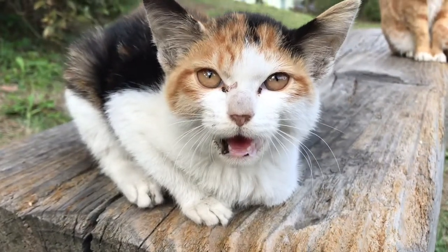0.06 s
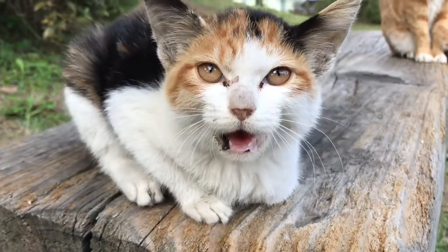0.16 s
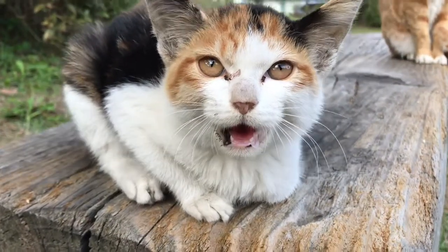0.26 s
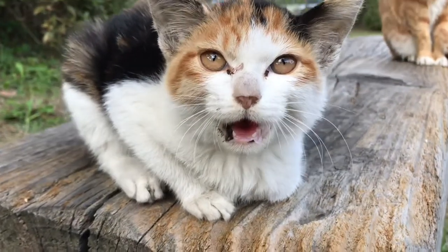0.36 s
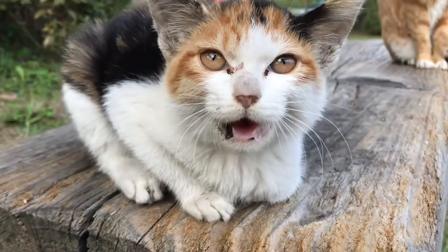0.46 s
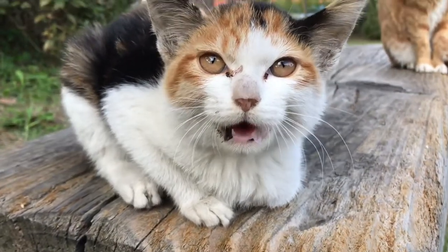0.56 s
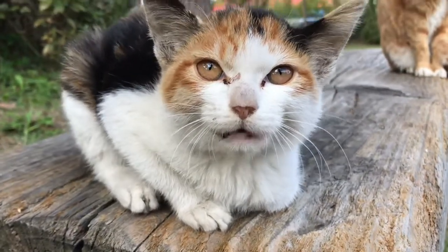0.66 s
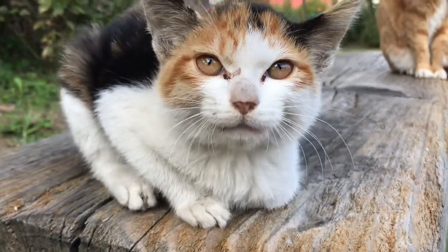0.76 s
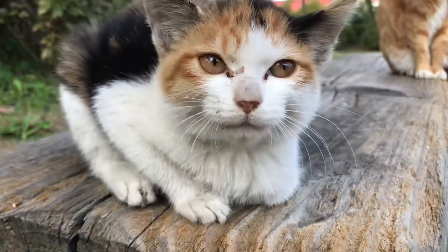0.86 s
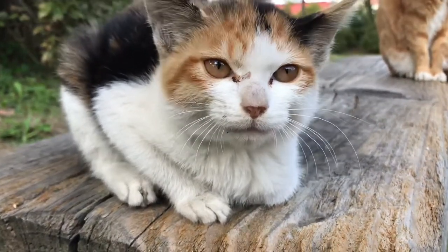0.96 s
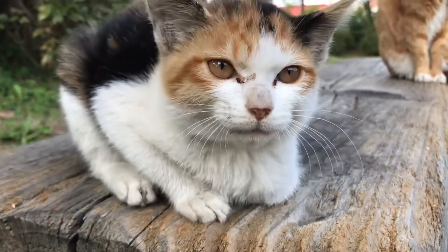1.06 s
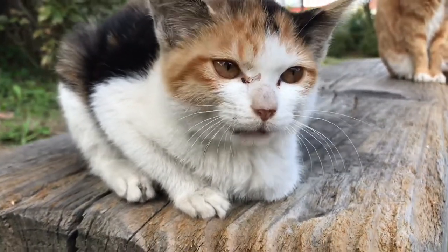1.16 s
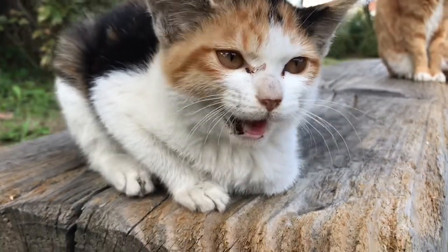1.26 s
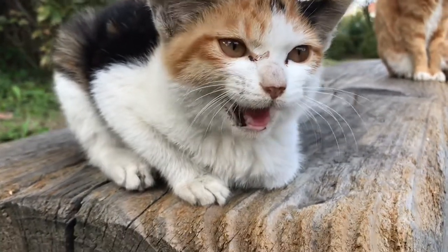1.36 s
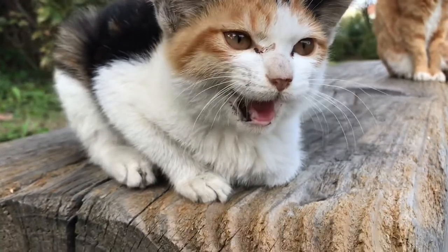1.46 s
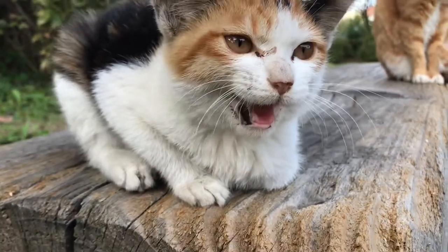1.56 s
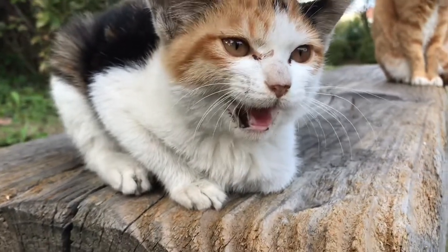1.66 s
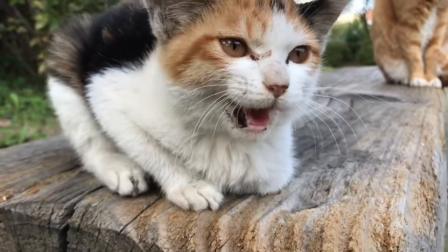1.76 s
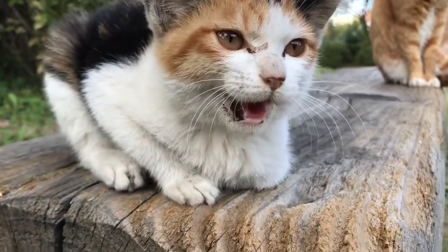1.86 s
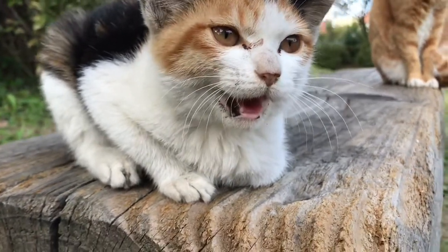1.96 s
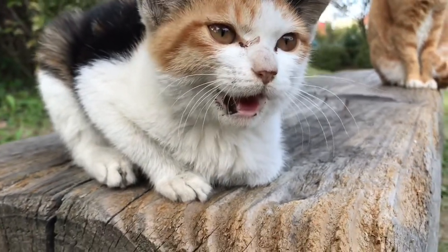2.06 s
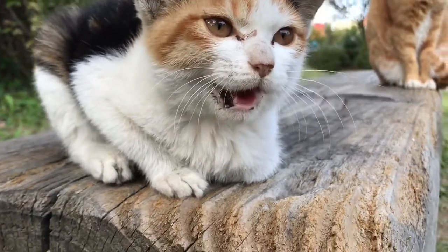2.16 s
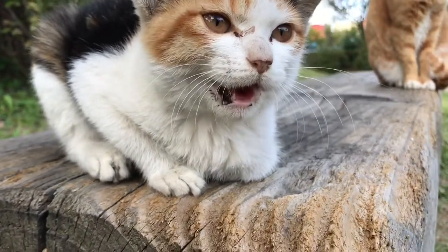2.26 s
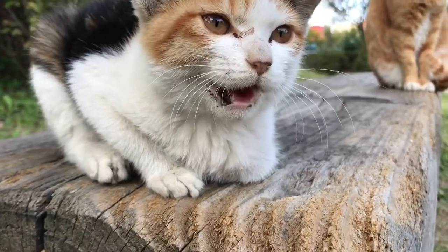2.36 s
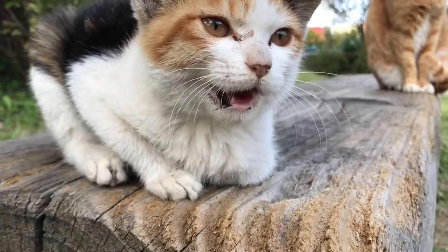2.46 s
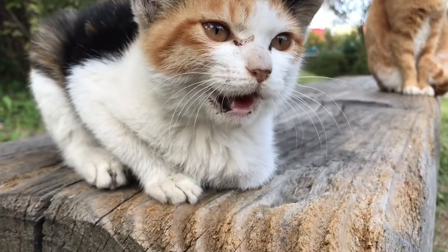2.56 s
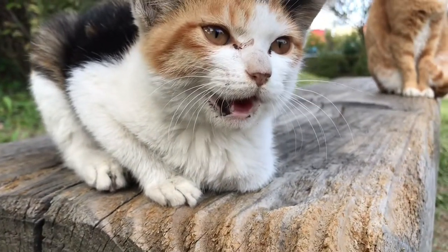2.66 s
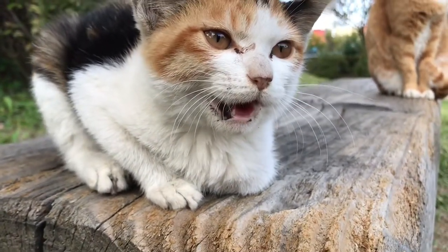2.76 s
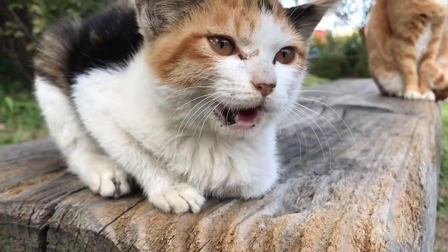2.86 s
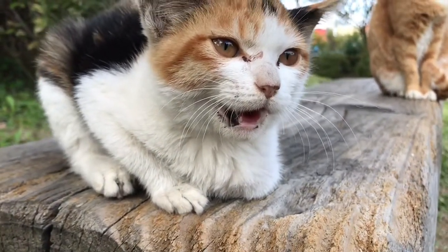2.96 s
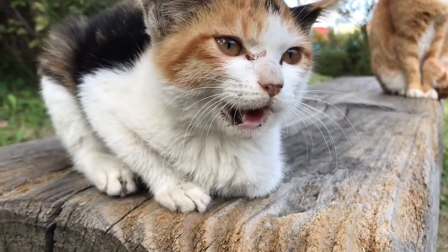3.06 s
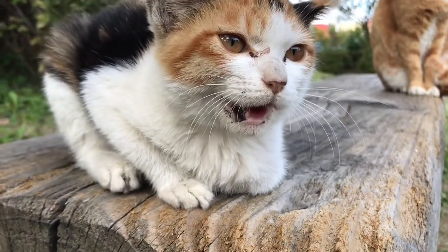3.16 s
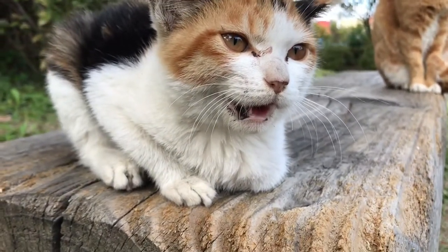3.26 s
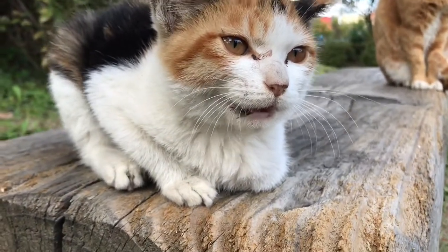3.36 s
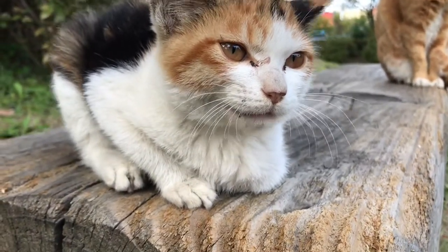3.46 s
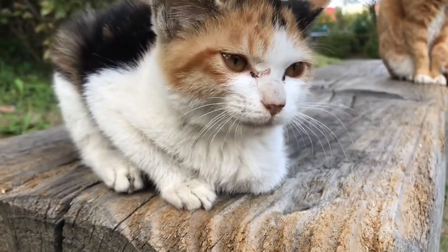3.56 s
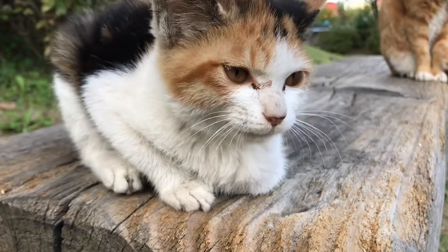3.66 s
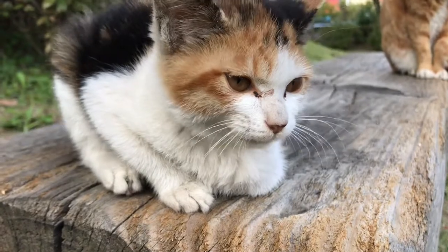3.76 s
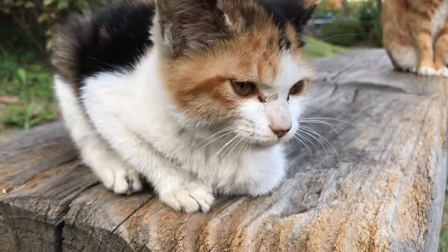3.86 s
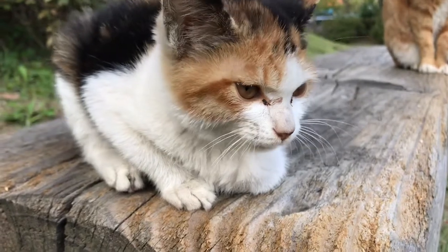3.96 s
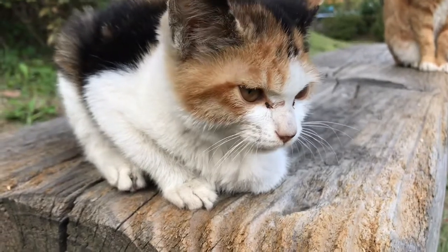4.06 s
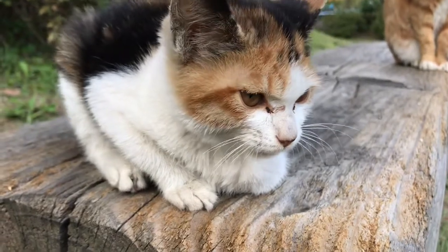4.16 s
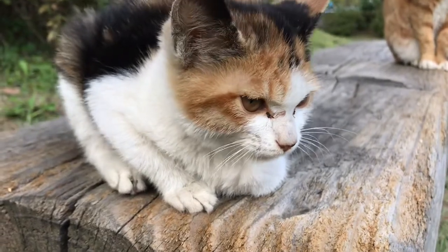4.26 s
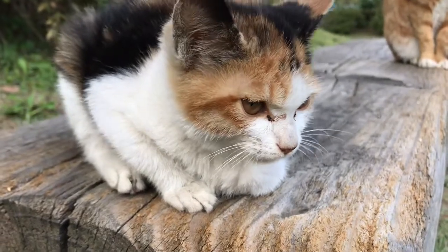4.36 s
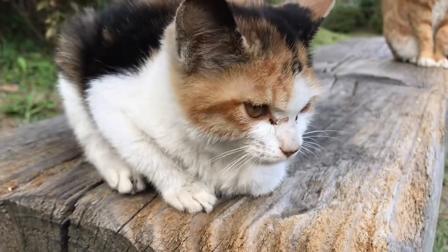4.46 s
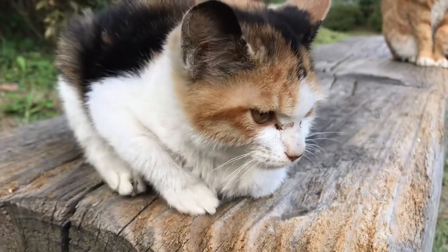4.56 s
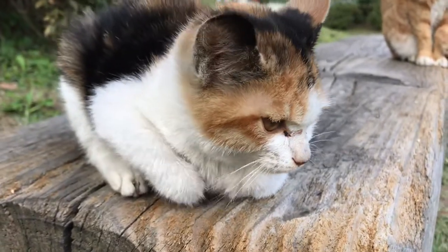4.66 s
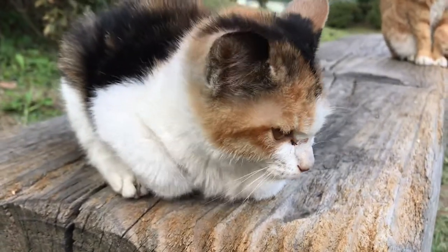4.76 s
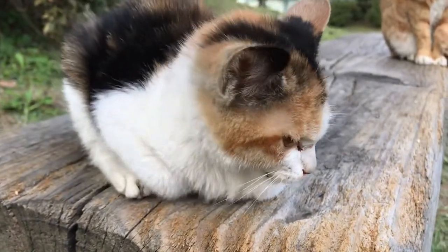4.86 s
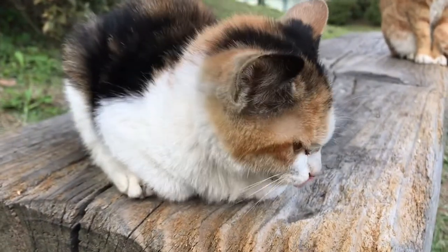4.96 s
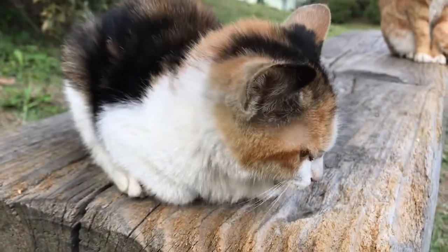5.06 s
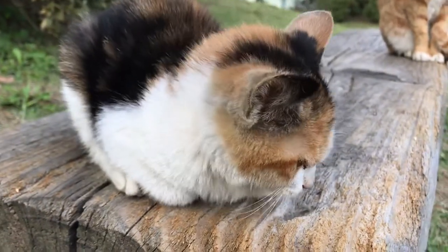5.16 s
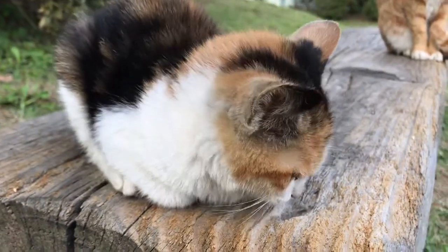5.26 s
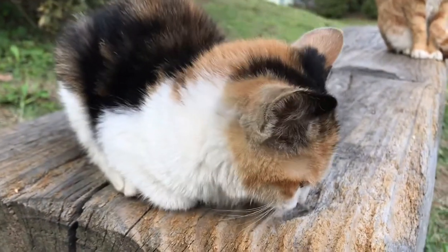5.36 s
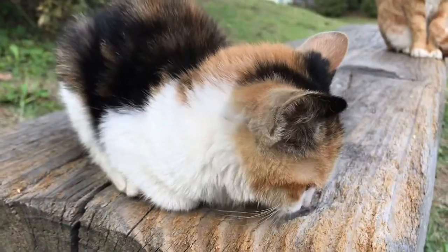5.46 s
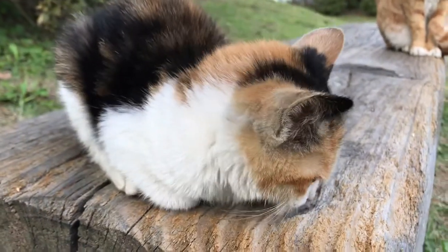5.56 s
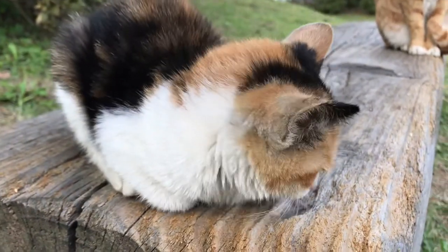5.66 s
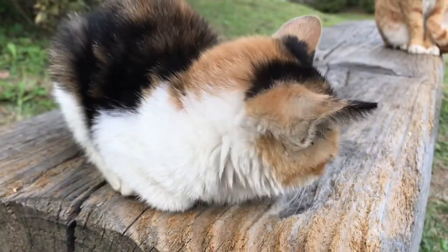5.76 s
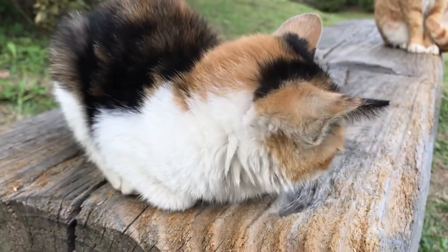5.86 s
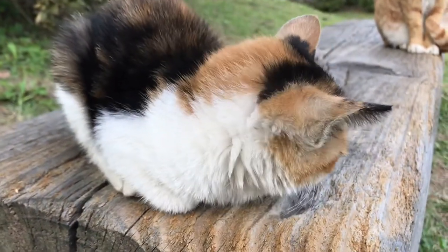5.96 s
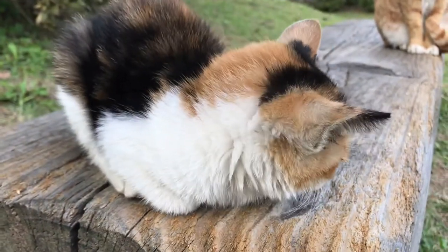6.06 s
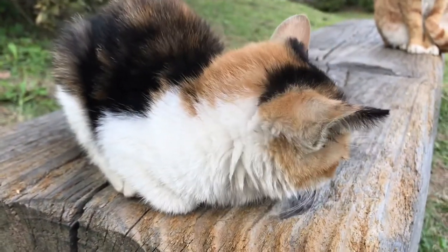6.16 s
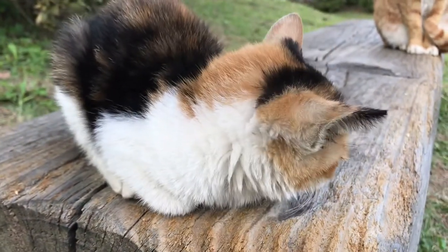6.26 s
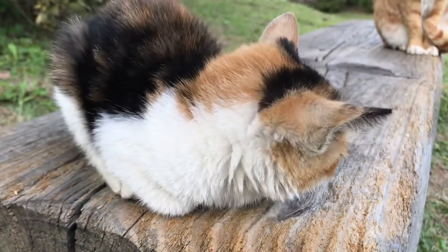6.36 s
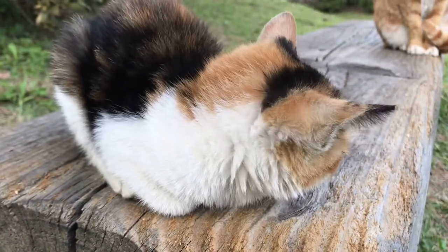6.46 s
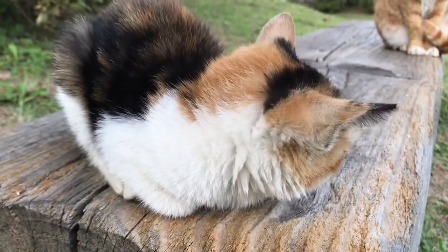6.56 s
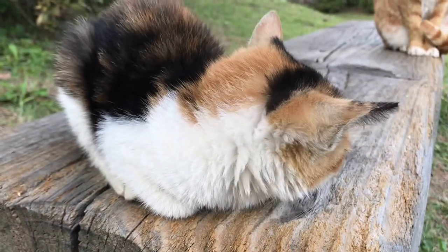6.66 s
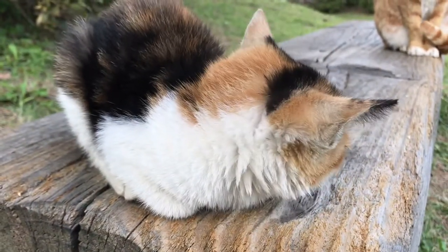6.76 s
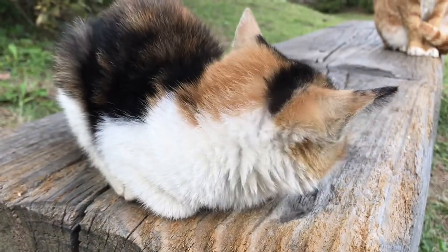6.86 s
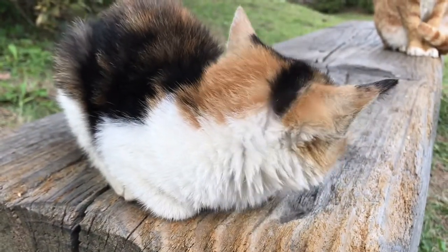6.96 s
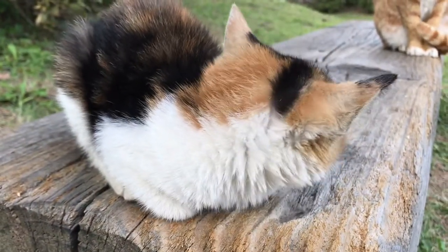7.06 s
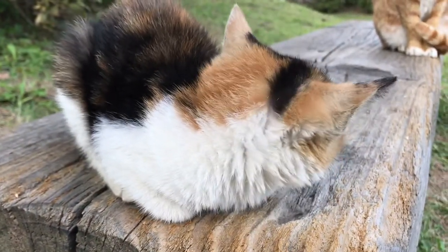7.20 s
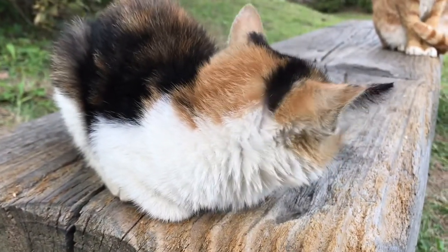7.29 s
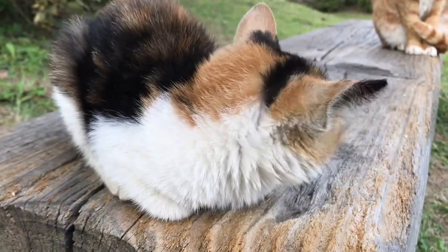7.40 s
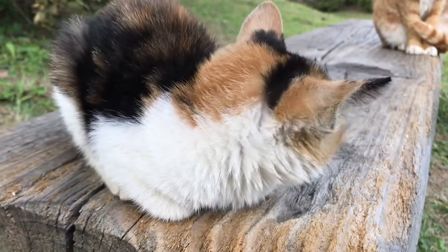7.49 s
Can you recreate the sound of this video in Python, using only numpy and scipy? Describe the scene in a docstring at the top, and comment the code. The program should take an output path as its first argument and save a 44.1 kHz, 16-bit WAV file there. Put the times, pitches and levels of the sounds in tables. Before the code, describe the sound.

Close raspy kitten mews outdoors, with a low idling engine, faint sliding bird whistles, wind thumps and distant dragged metal.

```python
"""A young cat on a log mews twice, close by, its voice breaking into rasps; another cat answers once.
Its vocal folds buzz, its throat and mouth shape the buzz, and uneven pulses make the rasp.
An engine hums a way off over a wash of traffic and leaves, a bird sings sliding whistles and puffs
of wind thump the microphone. Later comes a faint thin tone, then distant dragged metal scrapes and rings."""
import sys
import numpy as np
from scipy import signal
from scipy.fft import rfft, irfft
from scipy.io import wavfile
from scipy.ndimage import uniform_filter1d

SR = 44100
rng = np.random.default_rng(int(sys.argv[2]) if len(sys.argv) > 2 else 0)


def generate_wav(sig):
    """Save sig (samples, or channels by samples) to the path in sys.argv[1] as 16-bit PCM at SR."""
    pcm = np.round(np.clip(np.atleast_2d(sig).T, -1, 1) * 32767).astype(np.int16)
    wavfile.write(sys.argv[1], SR, pcm)


N = 332068


def gain(db):
    """Turns decibels into a multiplier."""
    return 10 ** (np.asarray(db) / 20)


def unit(x):
    """Scales a sound to an average (rms) level of 1."""
    return x / np.sqrt(np.mean(x ** 2) + 1e-20)


def steady(x):
    """Holds the level near 1 at every moment."""
    return x / np.sqrt(abs(uniform_filter1d(x ** 2, size=1500)) + 1e-12)


def level_at(curve, hz):
    """Looks up a tone curve's decibels at hz."""
    curve_hz, db = np.transpose(curve)
    return np.interp(np.log(hz + 1), np.log(curve_hz + 1), db)


def unroll(rows):
    """Joins a table's rows with straight lines, sample by sample."""
    times, *columns = np.transpose(rows)
    t = np.arange(max(times[0], 0), times[-1], 1 / SR)
    return t, [np.interp(t, times, column) for column in columns]


def add(mix, start_s, sound):
    """Mixes a sound in, cutting off what runs past the end."""
    part = mix[round(start_s * SR):][:len(sound)]
    part += sound[:len(part)]


def bump(t, middle_s, length_s):
    """A smooth rise and fall."""
    return np.exp(-(2 * (t - middle_s) / length_s) ** 4)


def noise(t):
    """Plain hiss, as long as t."""
    return rng.standard_normal(len(t))


def wander(t, hz):
    """A smooth random wobble of size 1, changing about hz times a second."""
    return unit(signal.sosfilt(signal.butter(2, hz, fs=SR, output="sos"), noise(t)))


def resonate(x, hz, width_hz, order=2):
    """Keeps the sound near hz: shifts it down to zero, smooths it and shifts it back."""
    spin = np.exp(2j * np.pi * np.cumsum(hz * np.ones(len(x))) / SR)
    pole = np.exp(-np.pi * width_hz / SR)
    return 2 * (spin * signal.sosfilt([[1 - pole, 0, 0, 1, -pole, 0]] * order, x / spin + 1e-18)).real


# Where the voice cracks: middle_s, length_s, scatter_cycles
RASPS = [(.05, .015, .012), (.112, .008, .022), (.282, .01, .02), (.305, .014, .017), (.668, .024, .08),
         (1.31, .035, .08), (1.365, .02, .015), (1.67, .025, .005), (.35, .05, .005), (2.53, .03, .022),
         (2.685, .05, .06), (2.73, .02, .03), (2.79, .05, .022), (2.845, .035, .075), (2.882, .016, .06),
         (2.935, .03, .055), (3.062, .012, .035), (3.095, .022, .065), (3.135, .022, .06),
         (3.175, .035, .06), (3.25, .032, .065), (3.33, .03, .015), (2.96, .62, .011), (3.42, .02, .07)]

def vocal_folds(t, hz):
    """The folds buzz; in a rasp the pitch sags and pulses come early or late, weak or strong."""
    scatter = .00125 + sum(depth * bump(t, s, length) for s, length, depth in RASPS)
    even_cycles = np.cumsum(hz * (1 - .3 * scatter + .00643 * wander(t, 35.3))) / SR
    cycles = even_cycles + scatter * wander(t, 170)
    # the k * k term smears each pulse into a short sweep
    pulses = unit(sum(np.cos(2 * np.pi * (k * cycles + .045 * k * k)) for k in range(2, 23)))
    buzz = pulses * (1 + 4 * scatter * wander(t, 200)) + .035 * noise(t)
    return buzz, scatter, even_cycles, cycles


# Bright ringing behind the teeth and at the lips: pitch_hz, width_hz, level_db
TEETH_BANDS = [(5690, 1570, 5.5), (7500, 640, -4), (8630, 1500, 5.5)]
LIP_BANDS = [(11130, 1100, 3.5), (14100, 2900, -7)]
# The shape of each mew: time_s, pitch_hz, throat_db, mouth_hz, mouth_db, front_db
MEW_SHAPES = [
    [(0.0, 703, -37, 2480, -38, -37), (.04, 701, -40.5, 2470, -37.5, -39),
     (.11, 735, -41.5, 2630, -30.5, -35.5), (.21, 719, -41.5, 2570, -34.5, -38),
     (.34, 722, -40, 2570, -32, -37.5), (.384, 696, -38, 2514, -36.5, -40.5),
     (.44, 710, -39, 2510, -35, -38), (.615, 621.5, -37, 2020, -41, -44.5),
     (.68, 575, -45.5, 2366, -54, -46.5)],
    [(1.3, 491, -54, 2660, -50, -61), (1.33, 566, -52, 2760, -48, -50.5),
     (1.38, 674, -43, 2840, -43.5, -48), (1.48, 745, -44.5, 2660, -52, -42.5),
     (1.56, 751, -43, 2930, -39, -38.5), (1.72, 764.4, -44, 2850, -39, -39.5),
     (1.84, 744, -41.5, 2880, -38, -40.5), (1.96, 745, -39, 2490, -41, -42),
     (2.17, 681, -40, 1905, -34.5, -46.5), (2.23, 695, -45.5, 1860, -33, -48.5),
     (2.36, 685, -40, 1890, -36, -51.5), (2.55, 685, -36, 1910, -39, -50.5),
     (2.64, 664, -41.5, 1876, -32.5, -49), (2.73, 653, -39.5, 2120, -35, -45.5),
     (2.99, 650, -38, 2425, -36, -44), (3.24, 628, -39, 2150, -35.5, -46.5),
     (3.4, 592.4, -39.5, 1730, -41.5, -51.5), (3.43, 649, -48, 1867, -73, -42)],
]
# The tone of each mew: teeth_db, lips_db, eddy_db, closing_hum_db
MEW_TONES = [(-22.5, -62.5, -50.5, 13), (-16, -61.5, -65, -1)]

def mew(shape, teeth_db, lips_db, eddy_db, closing_hum_db):
    """The buzz rings in throat, mouth, teeth and lips, while air swirls over the tongue."""
    t, (hz, throat_db, mouth_hz, mouth_db, front_db) = unroll(shape)
    rise_hz = .96 * np.maximum(mouth_hz - 2436, 0)  # the front of the mouth follows the mouth upward
    bright_db = 6 * rise_hz / 1000
    mouth_db, front_db = (db + .92 * wander(t, 13.3) for db in (mouth_db, front_db))
    buzz, scatter, even_cycles, cycles = vocal_folds(t, hz)
    breathy = buzz + (.5 + 9 * scatter) * noise(t)
    teeth, lips = (sum((-1) ** k * gain(db + k * bright_db) * resonate(breathy, band_hz + rise_hz, width)
                       for k, (band_hz, width, db) in enumerate(bands))
                   for bands in (TEETH_BANDS, LIP_BANDS))
    gusts = (1 + np.cos(2 * np.pi * cycles)) * noise(t)  # one gust of breath a pulse
    eddies = unit(resonate(gusts, 2590, width_hz=930, order=3))
    voice = gain(throat_db) * steady(resonate(buzz, 2 * hz, width_hz=860, order=4))
    voice -= gain(mouth_db) * steady(resonate(buzz, mouth_hz, width_hz=1530, order=4))
    voice += gain(front_db) * steady(resonate(buzz, 3740 + rise_hz, width_hz=1810, order=4))
    voice -= gain(front_db + teeth_db + bright_db) * steady(teeth)
    voice -= gain(lips_db + .55 * (throat_db + 37)) * steady(lips)  # partly follows the throat's level
    voice += gain(eddy_db + 84 * scatter + 4 * wander(t, 30)) * eddies
    hum_db = -54.5 + closing_hum_db * bump(t, t[-1], .046)  # the lowest tone can swell as the lips close
    voice += gain(hum_db) * np.sqrt(2) * np.cos(2 * np.pi * even_cycles)
    return t[0], -voice * signal.windows.tukey(len(t), 400 / len(t))


# The idling hum: time_s, firing_hz, firing_db, octave_below_db
ENGINE_IDLE = [(0.0, 132, -31, -36), (.08, 132.6, -38, -38), (1.45, 133.5, -38.5, -42.5),
               (1.68, 133.5, -38, -38.5), (2.3, 133, -36.5, -41.5), (2.53, 137, -51.5, -42.5),
               (2.68, 138, -33, -50), (2.9, 136.5, -44, -47), (3.4, 137, -43.5, -47),
               (4.28, 136.7, -43, -47.5), (4.57, 130, -37, -44), (4.85, 132.7, -41, -46),
               (5.68, 132.5, -34.5, -38.5), (5.9, 132, -39.5, -50), (6.17, 133.5, -35.5, -42),
               (6.33, 136, -47.5, -44.5), (6.64, 132.3, -35, -37), (6.98, 132.5, -40.5, -46.5),
               (7.53, 132.5, -33, -37.5)]
# Its higher tones: times_firing_rate, level_db (played 40 dB lower, whatever the firing level)
ENGINE_OVERTONES = [(1.499, -20), (2.048, -18), (2.498, -31.5)]

def engine():
    """The firing makes two low, wavering tones; higher ones are blurred by distance."""
    t, (hz, firing_db, half_db) = unroll(ENGINE_IDLE)
    cycles = np.cumsum(hz) / SR
    firing = gain(firing_db + wander(t, 5.6)) * np.sin(2 * np.pi * cycles)
    half = gain(half_db + 1.14 * wander(t, 3.5)) * np.sin(np.pi * cycles + .32 * wander(t, 11))
    upper = sum(gain(db - 40) * unit(resonate(noise(t), k * hz, 18.2)) for k, db in ENGINE_OVERTONES)
    return t[0], np.sqrt(2) * (firing + half) + upper


# The tone of the background: pitch_hz, relative_db
BACKGROUND_TONE = [(15, -34), (25, -13), (53, -0.5), (91, -5.5), (140, 2), (160, -4.5), (183, -6),
                   (274, -9.5), (445, -23), (1240, -26), (1380, -26.5), (3170, -34), (4380, -39.5),
                   (5010, -44.5), (15500, -54.5)]

def traffic_and_leaves(level_db=-46):
    """Far traffic and leaves blend into a low wash with drifting louder patches."""
    frames, hz = N // 512 + 5, np.fft.rfftfreq(2048, 1 / SR)
    real, imaginary, patches = rng.standard_normal((frames, 1025, 3)).T
    patches = unit(uniform_filter1d(uniform_filter1d(patches, size=20, axis=0), size=6, axis=1))
    spectra = (real + 1j * imaginary) * gain(level_at(BACKGROUND_TONE, hz)[:, None] + 1.27 * patches)
    wash = signal.istft(spectra, nperseg=2048, noverlap=1536)[1]
    return gain(level_db) * unit(wash[:N])


# Clicks of lips and tongue: start_s, level_db, pitch_hz
LIP_SMACKS = [(.646, -27, 3600), (.667, -28, 2600), (1.298, -33, 3000), (3.40, -42, 4000),
              (3.515, -42, 7000), (3.5152, -47, 2500), (4.24, -52, 5000)]
# Air through the teeth: middle_s, length_s, level_db, pitch_hz
TEETH_HISSES = [(.672, .036, -50, 13300), (.669, .024, -47.5, 3200), (.69, .04, -60, 3400),
                (1.312, .03, -57, 3200), (3.43, .04, -55.5, 10500), (3.435, .03, -55, 3800)]

def mouth_noises():
    """Short hisses and wet clicks as the cat's mouth opens and shuts."""
    out, t = np.zeros(N), np.arange(N) / SR
    for middle_s, length_s, db, hz in TEETH_HISSES:
        out += gain(db) * bump(t, middle_s, length_s) * unit(resonate(noise(t), hz, .26 * hz))
    click_t = t[:300]
    for start_s, db, hz in LIP_SMACKS:
        add(out, start_s, gain(db) * np.exp(-click_t / .0005) * np.sin(2 * np.pi * hz * click_t))
    return out


def bird_melody(notes, bottom_hz=1040, creep_hz_per_s=400):
    """Each note heads for its top pitch, creeps upward, slides to the bottom and waits there."""
    t = np.arange(notes[0][0], notes[-1][5], 1 / SR)
    hz, effort_db = np.zeros((2, len(t)))
    for start_s, first_hz, top_hz, climb_s, slide_start_s, end_s, bend, db in notes:
        age = np.maximum(t - start_s, 0)
        climb = first_hz + (top_hz - first_hz) * np.tanh((age / climb_s) ** 1.4) + creep_hz_per_s * age
        slide = np.clip((t - slide_start_s) / (end_s - slide_start_s), 0, 1) ** bend
        begun = t >= start_s
        hz[begun] = (climb + (bottom_hz - climb) * slide)[begun]
        effort_db[begun] = db
    return t, uniform_filter1d(hz, 800, mode="nearest"), uniform_filter1d(effort_db, 2000, mode="nearest")


# Notes of each phrase: start_s, first_hz, top_hz, climb_s, slide_start_s, end_s, slide_bend, effort_db
BIRD_PHRASES = [
    [(.68, 1950, 1950, .07, .68, .82, .8, -63), (.825, 1050, 1960, .065, 1.0, 1.195, 3.2, -62)],
    [(3.09, 1510, 1510, .07, 3.09, 3.2, 1.1, -61), (3.21, 1070, 1900, .095, 3.585, 3.84, .9, -63),
     (3.84, 1030, 990, .03, 3.89, 3.9, 1, -68)],
    [(6.22, 1200, 1910, .115, 6.65, 6.75, .75, -63), (6.75, 1070, 1960, .068, 7.02, 7.265, .95, -62),
     (7.34, 1040, 1770, .065, 7.54, 7.56, 1, -68)],
]
# How the beak colours the song: pitch_hz, boost_db
BEAK_TONE = [(1000, -12), (2000, -21), (2600, 2), (3500, 6), (4400, 2), (5400, -6.5), (6200, -14),
             (7100, -31), (8300, -16), (10000, -24), (12500, -69)]

def bird(notes):
    """A sliding whistle shaped by the beak; high notes flutter, low or falling ones lose odd harmonics."""
    t, hz, effort_db = bird_melody(notes)
    height = np.clip((hz - 1300) / 520, 0, 1)
    trill = height * np.sin(2 * np.pi * 33 * t + 1.5 * wander(t, 6))
    cycles = np.cumsum(hz * (1 + .02 * trill + (.0082 + .0163 * height) * wander(t, 84))) / SR
    falling = np.clip(-uniform_filter1d(np.gradient(hz) * SR, size=900) / 3000, 0, 1)
    odd_db = 4 - 18 * (1 - height) - 7.5 * falling
    tone = sum(gain(level_at(BEAK_TONE, k * hz) + odd_db * (k % 2)) * np.sin(2 * np.pi * k * cycles)
               for k in range(1, 11))
    flutter_db = 2.2 * trill + 2.6 * wander(t, 34)
    low_note_db = 2 * (1 - height)
    return t[0], gain(effort_db + low_note_db + flutter_db) * tone * signal.windows.tukey(len(t), .12)


# Wind hitting the microphone: start_s, level_db, pitch_hz, half_length_s
WIND_PUFFS = [(1.306, -18.5, 73, 0.02), (1.385, -26, 84.5, 0.032), (1.425, -30, 65.6, 0.03),
              (1.572, -23.5, 70, 0.019), (1.636, -22, 76, 0.038), (1.93, -31, 117, 0.022),
              (2.012, -34, 72.7, 0.021), (2.899, -53, 45.3, 0.026), (2.994, -36, 116.5, 0.031),
              (3.478, -25, 61.6, 0.013)]

def wind_puff(db, hz, half_length_s):
    """Air pushes on the microphone: a thump of a few cycles, falling in pitch."""
    age = np.linspace(0, 2, round(2 * half_length_s * SR))
    push = (np.e * 2 * age * np.exp(-2 * age)) ** 2
    cycles = hz * half_length_s * (1.28 * age - .32 * age * age)
    return gain(db) * push * np.sin(2 * np.pi * cycles)


def wavering_tone(rows, harmonics, waver):
    """A stack of pure tones on a slightly unsteady pitch."""
    t, (hz, db) = unroll(rows)
    cycles = np.cumsum(hz * (1 + waver * wander(t, 18))) / SR
    tone = sum(gain(relative_db) * np.sin(2 * np.pi * k * cycles) for k, relative_db in harmonics)
    return t[0], gain(db) * np.sqrt(2) * tone * signal.windows.tukey(len(t), .08)


# The other cat's call: time_s, pitch_hz, level_db
ANSWER_SHAPE = [(2.25, 750, -50), (2.29, 804, -57), (2.36, 790, -59), (2.39, 848, -57), (2.42, 809, -59),
                (2.5, 787, -60), (2.56, 756, -54), (2.66, 765, -60), (2.74, 737, -56)]
# The tones in its voice: times_pitch, relative_db
ANSWER_HARMONICS = [(1, 0), (2, -8), (3, -3), (4, -3), (5, -12)]

def answering_cat():
    """A second cat gives one soft mew from farther off."""
    return wavering_tone(ANSWER_SHAPE, ANSWER_HARMONICS, waver=.0088)


# A faint tone: time_s, pitch_hz, level_db
THIN_TONE = [(3.4, 590, -61), (3.46, 588.4, -64), (4.33, 587, -64), (4.45, 580, -71)]

def thin_tone():
    """One faint, pure tone, sounding just under the listed pitch."""
    return wavering_tone(THIN_TONE, [(.99, 0)], waver=.0026)


# How loud the dragging is: time_s, level_db, relative_treble_db
DRAG_LEVELS = [(4.3, -77, -12), (4.42, -75, -18), (4.49, -58.5, -28), (4.64, -63.5, -29), (4.72, -61, -4),
               (4.83, -49.5, -13.5), (5.0, -53, -15.5), (5.55, -51, -15), (5.62, -56, 0),
               (5.76, -55.5, -1.5), (6.0, -57.5, -12.5), (6.2, -59.5, -11), (6.4, -73, -6)]
# The tone of the scrape: pitch_hz, relative_db
GRIT_TONE = [(210, -22), (350, -4.5), (780, -6.5), (985, -2), (1290, -3.5), (1860, -9), (2270, -2),
             (5000, -24), (6500, -25), (11000, -120)]
# The metal's own notes: pitch_hz, width_hz, relative_db
METAL_NOTES = [(1010, 70, -2), (1380, 50, 2), (1600, 90, -8), (2250, 90, -1), (2650, 110, -3),
               (3280, 70, -1), (3750, 110, -10), (4510, 60, -4), (5540, 120, -6), (5880, 90, -5),
               (6100, 90, -3), (6450, 100, -6), (8500, 900, -10)]
# Moments when it rings out: middle_s, length_s, level_db, centre_hz
RING_OUTS = [(4.5, .13, -62, 2400), (4.834, .21, -64, 1400), (4.82, .16, -71, 6000), (5.35, .26, -73, 6000),
             (5.454, .2, -70, 2285), (5.75, .26, -60, 3500), (5.74, .2, -71, 6000), (5.96, .36, -67, 1002),
             (6.115, .09, -65, 6200)]

def dragged_metal():
    """A gritty scrape in two broad bands; now and then it sets some of the metal's notes ringing."""
    t, (db, treble_db) = unroll(DRAG_LEVELS)
    grit = noise(t) * gain(wander(t, 9.4))
    body = irfft(rfft(grit) * gain(level_at(GRIT_TONE, np.fft.rfftfreq(len(t), 1 / SR))), len(t))
    out = gain(db) * (unit(body) + gain(treble_db) * unit(resonate(grit, 4150, width_hz=6200)))
    for hz, width_hz, note_db in METAL_NOTES:
        ringing = sum(gain(ring_db - 40 * np.log2(hz / centre_hz) ** 2) * bump(t, middle_s, length_s)
                      for middle_s, length_s, ring_db, centre_hz in RING_OUTS)
        ringing += gain(db - 20 - 3.7 * np.log2(hz / 2200) ** 2)  # every note hums along with the scrape
        out += gain(note_db + 3 * wander(t, 6)) * ringing * unit(resonate(grit, hz, width_hz))
    return t[0], out * signal.windows.tukey(len(t), .08)


def outdoor_echoes(x, fade_s=.48):
    """Sound bounces off log, ground and bushes as scattered, fading echoes."""
    echoes = np.zeros(SR // 2)
    slots = np.arange(100, len(echoes) - 20, 20)
    echoes[slots + rng.integers(0, 20, len(slots))] = rng.choice([-1., 1.], len(slots))
    echoes *= gain(-60 * np.arange(len(echoes)) / SR / fade_s)
    return signal.fftconvolve(x, echoes / np.linalg.norm(echoes))[:N]


def scene():
    """Mixes one channel: the near cat echoes a little, the far animals much more."""
    near, far, background = mouth_noises(), np.zeros(N), traffic_and_leaves()
    for shape, tone in zip(MEW_SHAPES, MEW_TONES):
        add(near, *mew(shape, *tone))
    add(background, *engine())
    for notes in BIRD_PHRASES:
        add(far, *bird(notes))
    for start_s, *shape in WIND_PUFFS:
        add(background, start_s, wind_puff(*shape))
    add(far, *answering_cat())
    add(background, *thin_tone())
    add(background, *dragged_metal())
    return (near + far + background + outdoor_echoes(gain(-22) * near + gain(-3) * far))[None]


def record(dry, lowest_hz=38, highest_hz=15670):
    """The microphone drops the deepest bass and the highest treble."""
    thinned = signal.sosfilt(signal.butter(3, lowest_hz, "high", fs=SR, output="sos"), dry)
    treble_cut = signal.firwin(1023, highest_hz, window=("kaiser", 9), fs=SR)
    return signal.oaconvolve(thinned, treble_cut[None], "same")


dry = scene()
out = record(dry)
generate_wav(out)
```